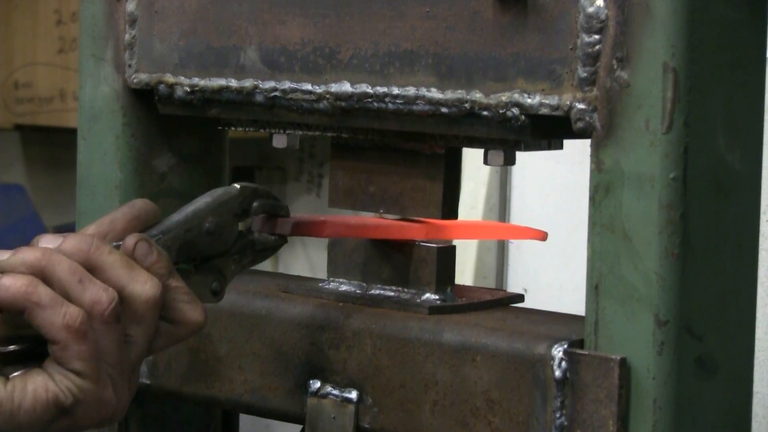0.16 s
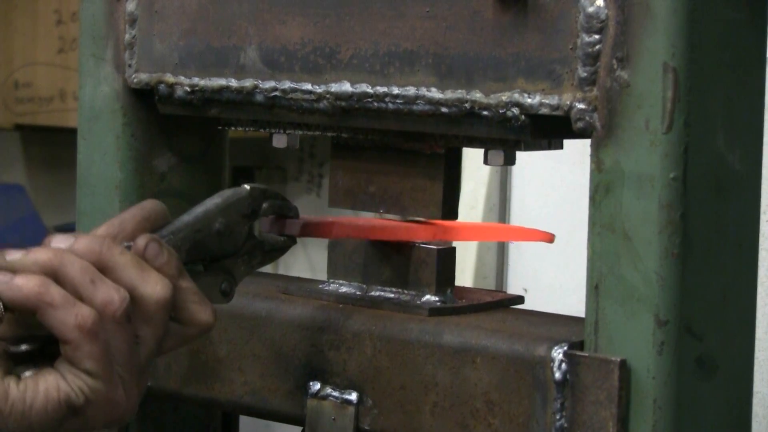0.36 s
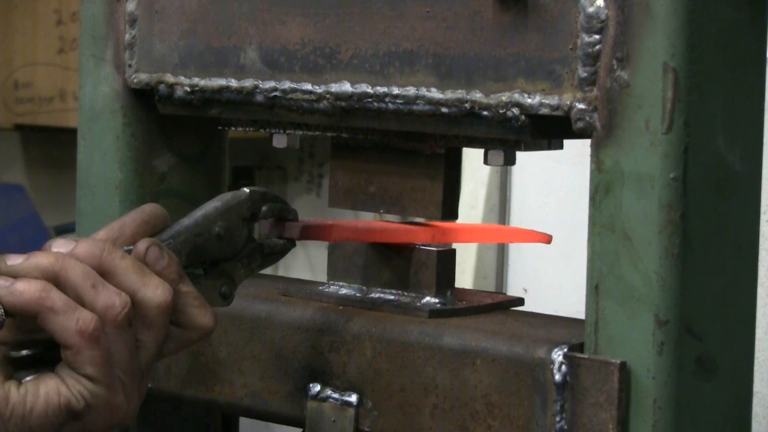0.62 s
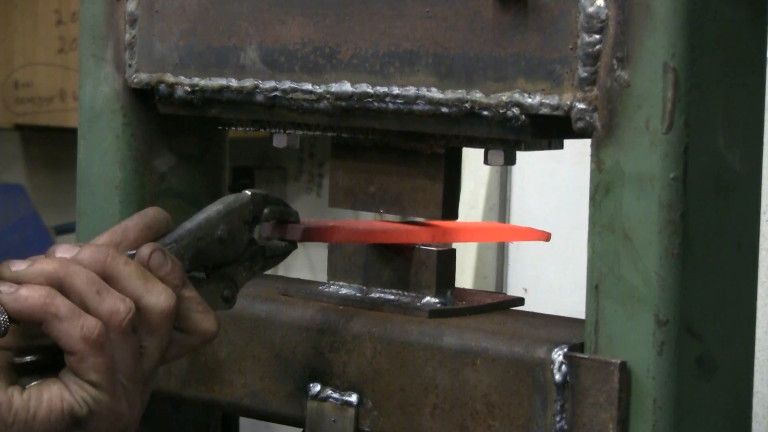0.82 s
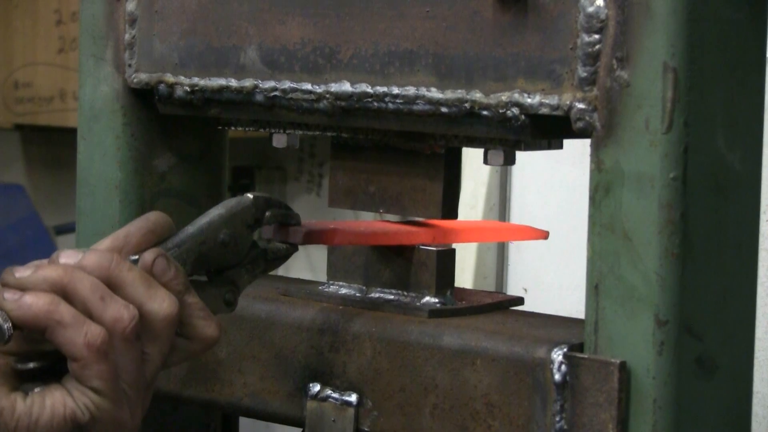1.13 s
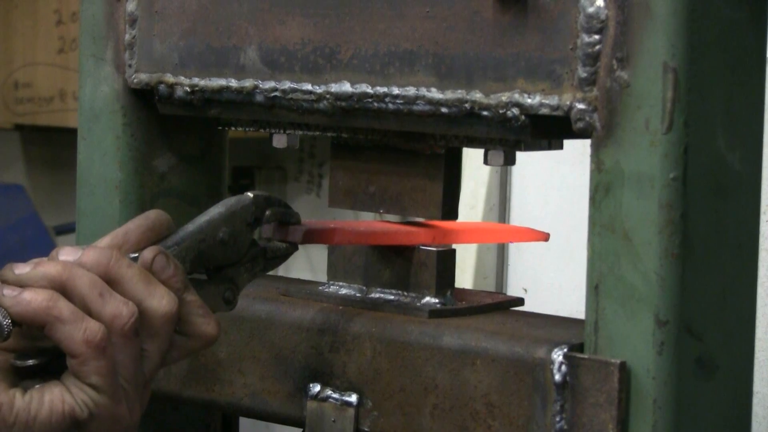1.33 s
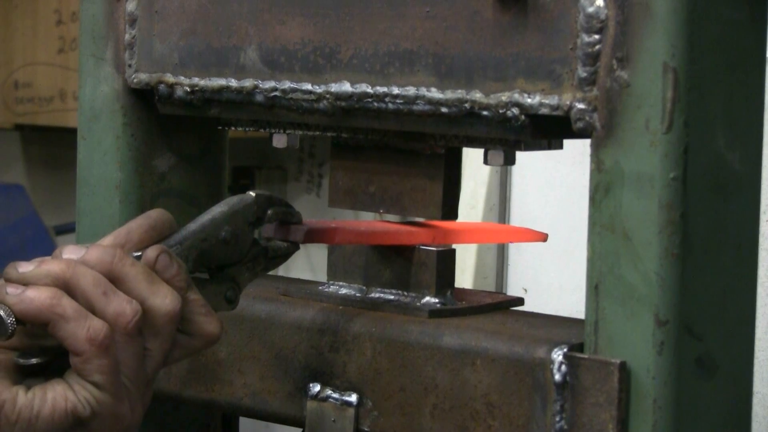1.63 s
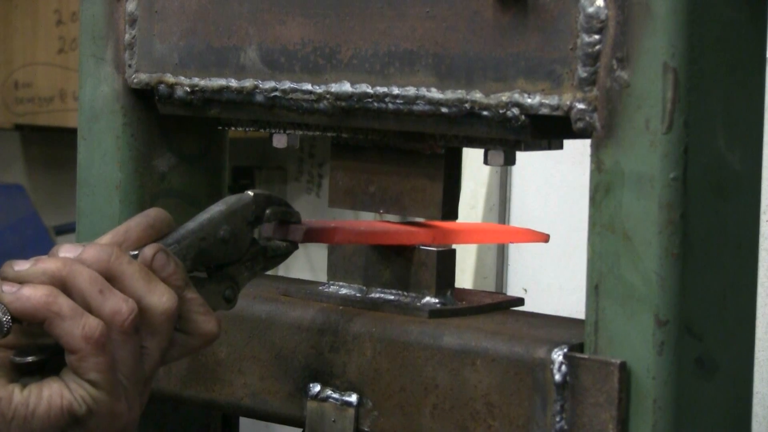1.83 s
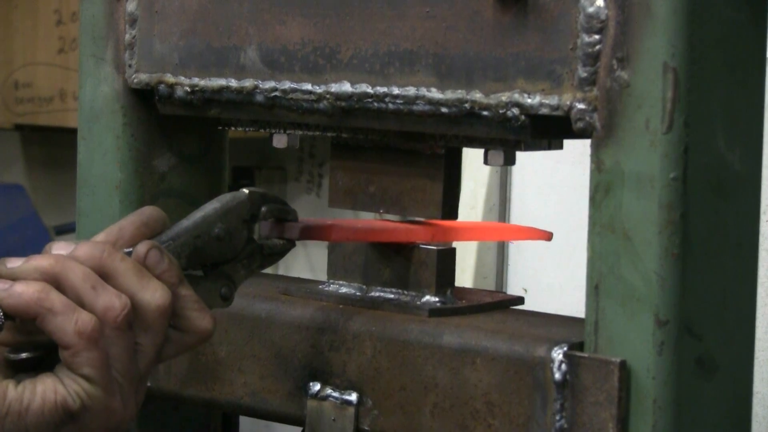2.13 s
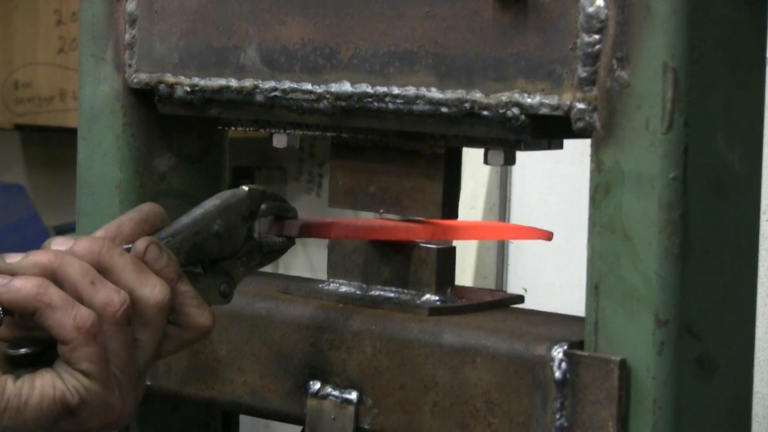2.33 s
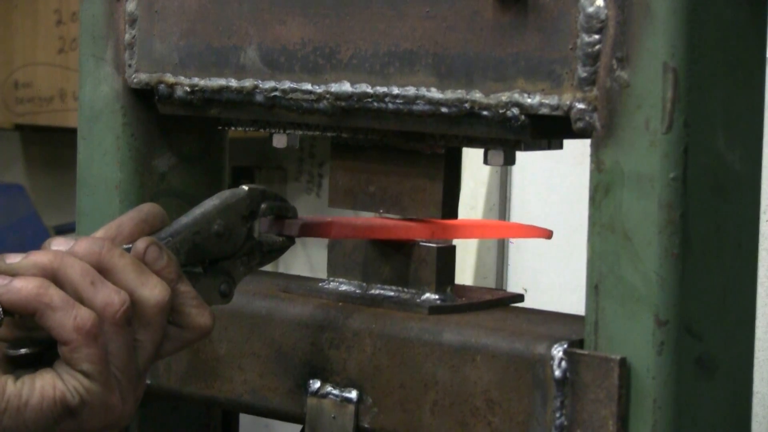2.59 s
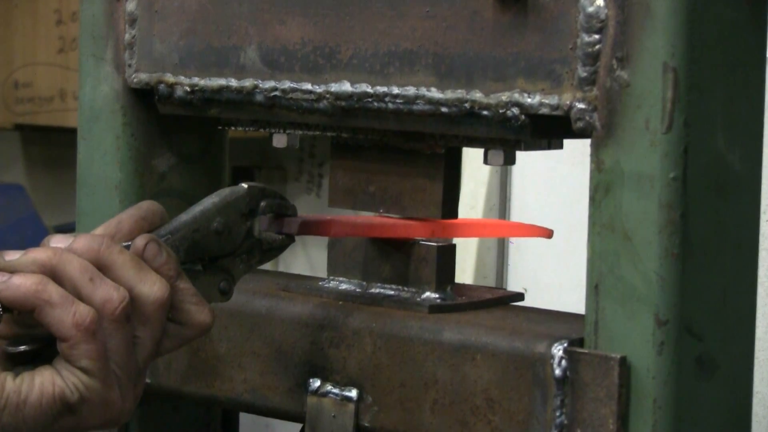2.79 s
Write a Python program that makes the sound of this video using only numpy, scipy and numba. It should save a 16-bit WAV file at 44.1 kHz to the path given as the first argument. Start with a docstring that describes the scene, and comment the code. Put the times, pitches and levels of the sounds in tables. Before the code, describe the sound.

A gas forge roars low and steady, close to the microphone, with a faint burner hiss and brief low overload crackles through the first two seconds. At about 2 seconds an air valve gives a tiny squeak and a hydraulic press pump starts, puffing sharp hisses about fifteen times a second until the end near 3 seconds. The puffs have a short workshop echo, and the roar ducks beneath them.

```python
"""A gas forge roars close to the microphone in a workshop, with brief overload crackles and a hissing
burner tube. At two seconds, in the same room, the air valve of a hydraulic press opens with a squeak and
its pump exhausts about 15 puffs a second. Hiss and press reach the microphone with a short room tail.
The puffs drive the camera's gain control down, so the roar ducks away under them."""
import sys
import numpy as np
from scipy import signal
from scipy.fft import rfft, irfft, next_fast_len
from scipy.io import wavfile
from scipy.ndimage import uniform_filter1d, map_coordinates
from numba import njit

SR = 44100
rng = np.random.default_rng(int(sys.argv[2]) if len(sys.argv) > 2 else 0)


def to_wav(s):
    """Save 16-bit WAV."""
    ch = np.atleast_2d(s).T  # columns
    pcm = np.round(np.clip(ch, -1, 1) * 32767)  # PCM
    wavfile.write(sys.argv[1], SR, pcm.astype(np.int16))


N = 130095

# air escaping from the press, at valve and pump alike (frequency [Hz], relative density [dB])
EXHAUST_SPECTRUM = [(300, -33), (1000, -15.5), (1400, -10), (2300, -11), (3000, -5), (4500, -5), (6100, 0),
                    (7200, -2.5), (8400, 1), (9700, -0.5), (11000, -6.5), (12600, -2), (15500, -3),
                    (17000, -17.5)]


def flame_roar():
    """The turbulent flame rings the forge chamber: close, dry and nearly centred."""
    # broad shape of the roar (frequency [Hz], relative density [dB])
    spectrum = [(20, -50), (65, -37), (105, -21.5), (140, -19), (195, -9.5), (290, -2.5), (385, -6.5),
                (450, -9), (580, -13), (660, -21), (770, -31), (900, -29), (1400, -46), (2500, -91)]
    # resonances of the forge chamber (frequency [Hz], width [Hz], lift [dB])
    chamber = [(214.8, 36.6, 6.5), (313.3, 22, 4.5), (343.3, 24.5, 9), (420.2, 26.3, 12), (484, 34.3, 8),
               (517.9, 18, 8), (551, 16, 6), (712.5, 40, 10), (950, 8.6, 11)]
    # the part that differs between left and right (frequency [Hz], relative density [dB])
    side_spectrum = [(30, -24), (120, -32.5), (220, -5.5), (350, 2.5), (520, 0.5), (750, -22),
                     (1400, -29.5), (2500, -39), (6000, -81)]
    roar_db, side_db, flutter_db = -7.5, -22, 0.5
    mid = rush(spectrum, chamber)
    side = amp(side_db) * np.outer([1, -1], rush(side_spectrum))
    return amp(roar_db + flutter_db * wobble(rate_hz=6.9)) * (mid + side)


def overload_bursts():
    """Brief low crackles at set times: the sound of the roar's loudest peaks overloading the microphone."""
    # centre of each crackle (time [s], level [dB])
    bursts = [(0.108, -6), (0.147, -7), (0.268, -7), (0.315, -12), (.457, -6), (.592, -10.5), (0.716, -18),
              (.958, -11), (1.041, -19), (1.151, -9), (1.419, -11.5), (1.602, -10), (1.752, -9.5),
              (1.902, -11)]
    # shape of the overload distortion (frequency [Hz], relative density [dB])
    spectrum = [(30, -17.5), (150, -6), (350, 8), (550, -1.5), (780, -18.5), (1200, -11.5), (1500, -23),
                (2200, -56.5), (6000, -82.5)]
    envelope = sum(amp(db) * swell(at, sigma_s=0.0031) for at, db in bursts)
    return envelope * rush(spectrum)


def burner_hiss():
    """The gas jet hisses through the resonant burner tube and out into the room."""
    # broad shape of the hiss (frequency [Hz], relative density [dB])
    spectrum = [(300, -13), (900, 0.5), (1800, -4), (3400, -1), (4200, -5.5), (6400, -4.5), (7300, -11.5),
                (9000, -16.5), (14000, -18), (15000, -40)]
    # resonances of the burner tube (frequency [Hz], width [Hz], lift [dB])
    tube = [(1620, 90, 9), (2275, 41, 10), (2380, 88, 12), (3120, 59, 9.5), (3830, 84, 9), (5680, 77, 9.5),
            (6010, 140, 9), (6480, 140, 4), (8100, 370, 4)]
    # slow drift of the hiss, before trim and sway (time [s], level [dB])
    drift = [(0.03, -33), (0.2, -32.5), (0.4, -31.5), (0.6, -32.5), (0.8, -32.5), (0.93, -31), (1.1, -32.5),
             (1.3, -33), (1.5, -32.5), (1.62, -30), (1.8, -31.5), (1.96, -33.5)]
    trim_db, sway_db = 2, 0.68
    hiss = unit(workshop(rush(spectrum, tube)))
    drift_db = np.interp(clock(), *np.transpose(drift))
    return amp(drift_db + trim_db + sway_db * wobble(rate_hz=22)) * hiss


def pump_puffs():
    """Each stroke opens the exhaust port abruptly; the blast sags, then dies as the cylinder empties."""
    # pump strokes (time [s], relative level [dB], hold before the fast fall [s])
    puffs = [(2.0498, 1.5, 0.023), (2.1153, 3, .025), (2.178, 2, 0.021), (2.24, -0.5, 0.03),
             (2.305, -0.5, 0.022), (2.368, 1.5, .025), (2.4325, 3, .023), (2.498, 4.5, 0.018),
             (2.561, 2, .022), (2.628, 3, 0.027), (2.6915, 0, 0.028), (2.7554, 0, 0.024),
             (2.8205, 1, 0.023), (2.885, -1.5, 0.031)]
    # resonances of the exhaust port (frequency [Hz], width [Hz], lift [dB])
    port = [(2920, 150, 1.5), (3640, 300, 3), (6050, 300, 2.5), (7720, 180, 1), (12600, 260, 1)]
    attack_s, sag_db_per_s, fall_db_per_s = 0.0028, 118, 570
    gain_db, uneven_db = 2.5, 0.56
    flow = np.zeros(N)
    for start, db, hold in puffs:
        age = np.maximum(clock() - start, 0)
        drop_db = sag_db_per_s * age + fall_db_per_s * np.maximum(age - hold, 0)
        flow += np.minimum(age / attack_s, 1) * amp(db - drop_db)
    return amp(gain_db + uneven_db * wobble(rate_hz=160)) * flow * rush(EXHAUST_SPECTRUM, port)


def valve_squeak():
    """Air squeezes through the opening valve, whistling and leaking ever more until the pump starts."""
    # whistles of the valve (frequency [Hz], width [Hz], start [s], level [dB])
    squeaks = [(8180, 340, 2.004, -30.5), (8070, 650, 2.022, -24), (4940, 250, 2.029, -33),
               (6720, 180, 2.03, -26), (1316, 420, 2.038, -22)]
    leak_start_s, leak_fade_s, open_s, edge_s = 2.005, 0.024, 2.051, 0.004
    leak_peak_db, leak_db_per_s = -13.5, 465
    leak_db = leak_peak_db - leak_db_per_s * np.abs(open_s - clock())
    air = amp(leak_db) * ramp(leak_start_s, leak_fade_s) * rush(EXHAUST_SPECTRUM)
    for hz, width, start, db in squeaks:
        whistle = filtered(rng.standard_normal(N), lambda f: 1 / (1 + (2 * (f - hz) / width) ** 2))
        air += amp(db) * ramp(start, edge_s) * unit(whistle)
    return air * (1 - ramp(open_s, edge_s))


def faint_tick():
    """A faint bright tick just before the valve opens."""
    # shape of the tick (frequency [Hz], relative density [dB])
    spectrum = [(3000, -23), (7000, 0), (11000, 0), (14000, -6), (15000, -25)]
    start_s, rise_s, t60_s, level_db = 1.863, 0.0037, 0.08, -35
    age = np.maximum(clock() - start_s, 0)
    return ramp(start_s, rise_s) * amp(level_db - 60 * age / t60_s) * rush(spectrum)


def workshop(direct):
    """At the microphone: direct sound plus a short room tail that widens towards the treble."""
    # decay of the room (frequency [Hz], t60 [s])
    decay = [(200, 0.41), (2000, 0.51), (7000, 0.22), (12000, 0.29), (16000, 0.15)]
    # strength of the tail (frequency [Hz], room over direct [dB])
    room_level = [(300, 11), (3000, -7), (8000, -1), (15000, -6.5)]
    # left-right likeness of the tail (frequency [Hz], correlation before clipping to +-1 [ratio])
    likeness = [(300, 0.77), (2500, 0.83), (4500, 0.25), (7000, 0.05), (15000, -1.5)]
    hz, t, noise = signal.stft(rng.standard_normal((2, SR // 2)), SR, nperseg=256)
    fade = amp(-60 * t / along(decay, hz)[:, None])
    tail = signal.istft(noise * fade, SR, nperseg=256)[1]
    wet = signal.fftconvolve(direct[None], tail / np.linalg.norm(tail[0]), axes=1)[:, :N]

    def mid_side_gains(f):
        angle = np.arccos(np.clip(along(likeness, f), -1, 1)) / 2
        return amp(along(room_level, f)) * [np.cos(angle), np.sin(angle)]

    mid, side = filtered(wet, mid_side_gains)
    return direct + np.array([mid + side, mid - side])


def rush(spectrum, resonances=()):
    """Noise of rms 1: a broad spectrum, lifted at its resonances."""
    lift_db = lambda f: sum(db * np.exp(-2 * ((f - hz) / width) ** 2) for hz, width, db in resonances)
    return unit(filtered(rng.standard_normal(N), lambda f: amp(along(spectrum, f) + lift_db(f))))


def amp(db):
    """Decibels to gain."""
    return 10 ** (np.asarray(db) / 20)


def unit(x):
    """Scale to rms 1."""
    return x / np.sqrt(np.mean(x ** 2) + 1e-20)


def clock():
    """The time of each sample in seconds."""
    return np.arange(N) / SR


def along(points, hz):
    """Interpolate (frequency [Hz], value) points on a log frequency axis."""
    freqs, values = np.transpose(points)
    return np.interp(np.log(hz + 1), np.log(freqs + 1), values)


def wobble(rate_hz):
    """A smooth curve through rate_hz random knots a second."""
    return map_coordinates(rng.standard_normal(1024), [clock() * rate_hz], mode="mirror")


def filtered(x, response):
    """Filter x by a gain given as a function of frequency."""
    size = next_fast_len(N + SR // 2)
    return irfft(rfft(x, size) * response(np.fft.rfftfreq(size, 1 / SR)), size)[..., :N]


def swell(centre_s, sigma_s):
    """A bell-shaped envelope."""
    return np.exp(-0.5 * ((clock() - centre_s) / sigma_s) ** 2)


def ramp(start_s, rise_s):
    """An envelope that climbs from 0 to 1 and stays there."""
    return np.clip((clock() - start_s) / rise_s, 0, 1)


@njit
def follow(x, rise, fall):
    """Track x with separate rise and fall times in samples."""
    tracked, level = np.empty_like(x), 0.
    for i in range(len(x)):
        level += (x[i] - level) / (rise if x[i] > level else fall)
        tracked[i] = level
    return tracked


def scene():
    """The forge and the press in one room, heard from one stereo microphone."""
    # stereo balance of the press (frequency [Hz], left minus right [dB])
    balance = [(4000, 0), (6000, -0.5), (8000, -2.5), (10500, -0.5), (13000, 4.5), (15500, 2)]
    press = workshop(pump_puffs() + valve_squeak() + faint_tick())
    press = filtered(press, lambda f: amp(np.outer([0.5, -0.5], along(balance, f))))
    return flame_roar() + overload_bursts() + burner_hiss() + press


def record(dry):
    """Behind the microphone: gain control that is keenest on treble, soft clipping and a band limit."""
    threshold_db, treble_weight_db, treble_hz = -1, 15, 3600
    grab_s, recover_s, look_ahead_s = 0.0021, 0.082, 0.0028
    linger_s, linger_share = 1.2, 0.8
    clip_db, top_hz = -0.5, 15900
    sensed = filtered(dry, lambda f: 1 + amp(treble_weight_db) * f ** 2 / (f ** 2 + treble_hz ** 2))
    power = np.abs(uniform_filter1d(np.mean(sensed ** 2, axis=0), size=64))
    excess_db = np.maximum(10 * np.log10(power + 1e-12) - threshold_db, 0)
    quick_db = follow(excess_db, grab_s * SR, recover_s * SR)
    lingering_db = linger_share * follow(excess_db, grab_s * SR, linger_s * SR)
    cut_db = np.maximum(quick_db, lingering_db)  # the roar stays down between puffs
    ducked = dry * amp(-np.interp(clock() + look_ahead_s, clock(), cut_db))
    clipped = ducked / (1 + np.abs(ducked / amp(clip_db)) ** 8) ** (1 / 8)
    return filtered(clipped, lambda f: f < top_hz)


dry = scene()
out = record(dry)
to_wav(out)
```